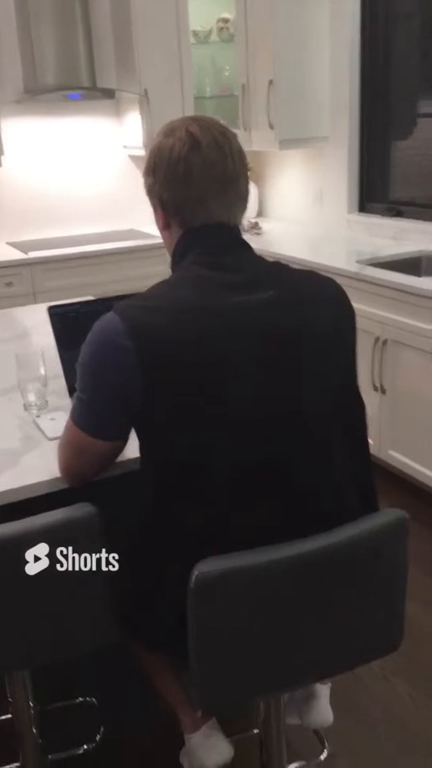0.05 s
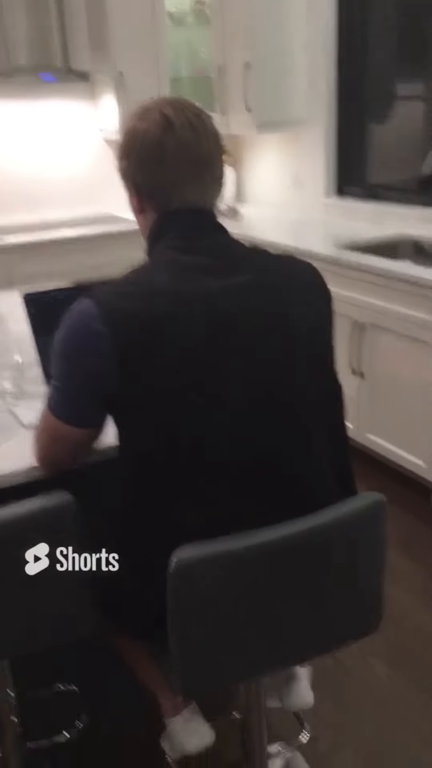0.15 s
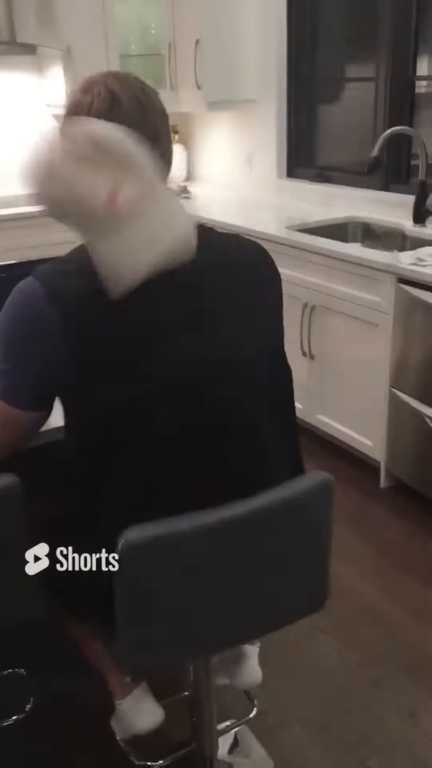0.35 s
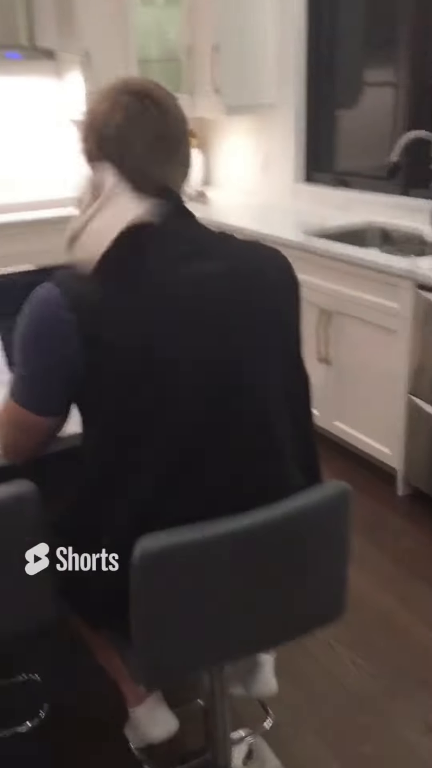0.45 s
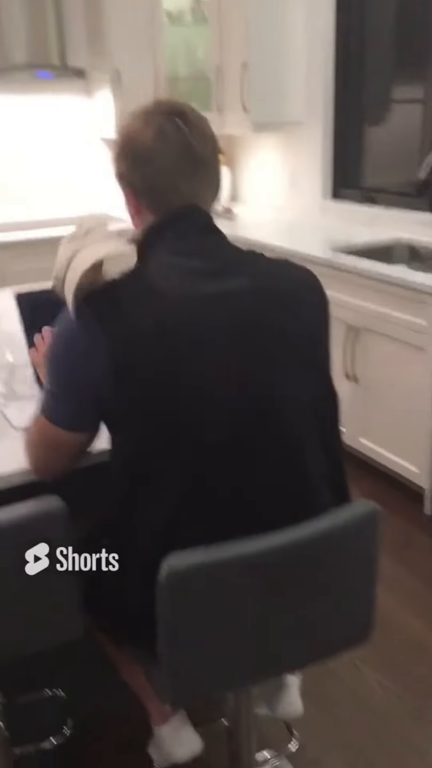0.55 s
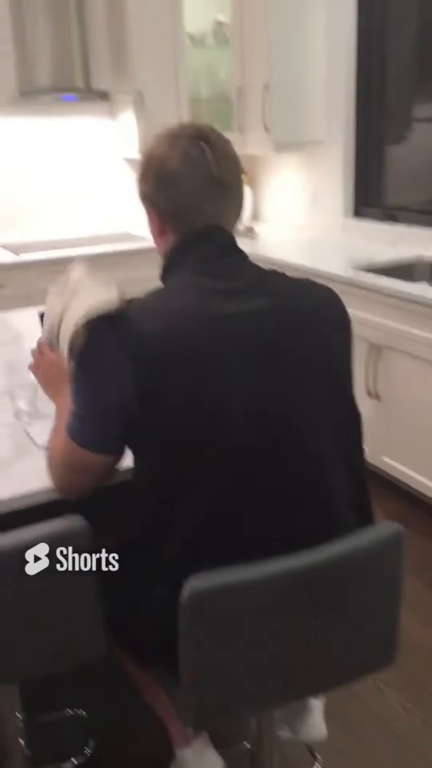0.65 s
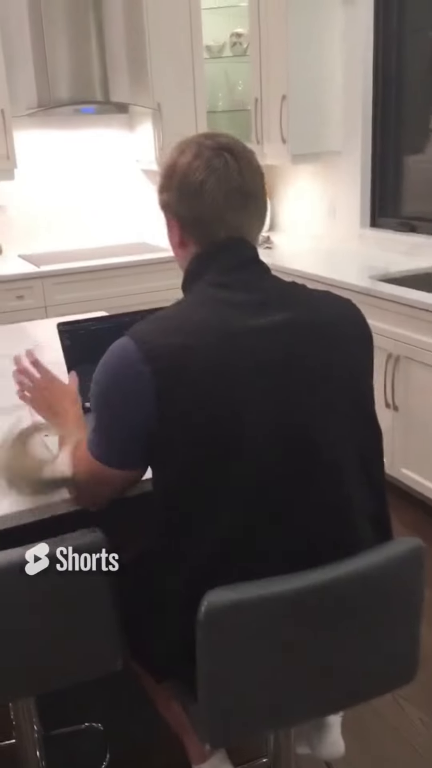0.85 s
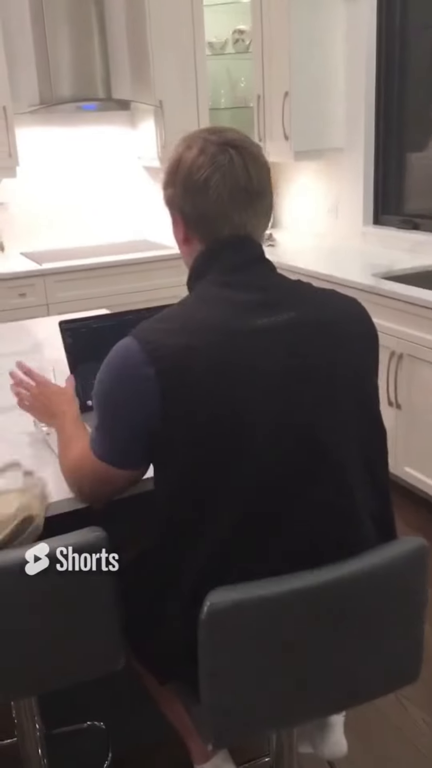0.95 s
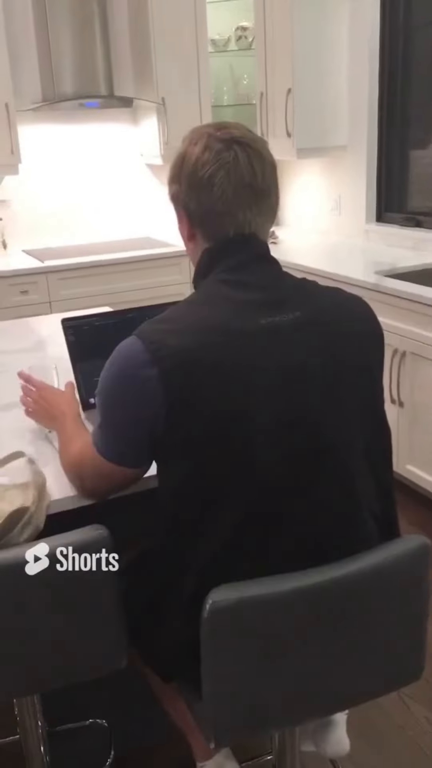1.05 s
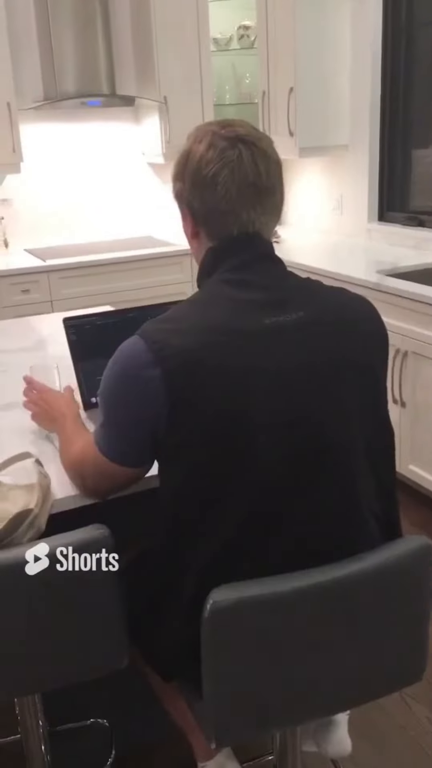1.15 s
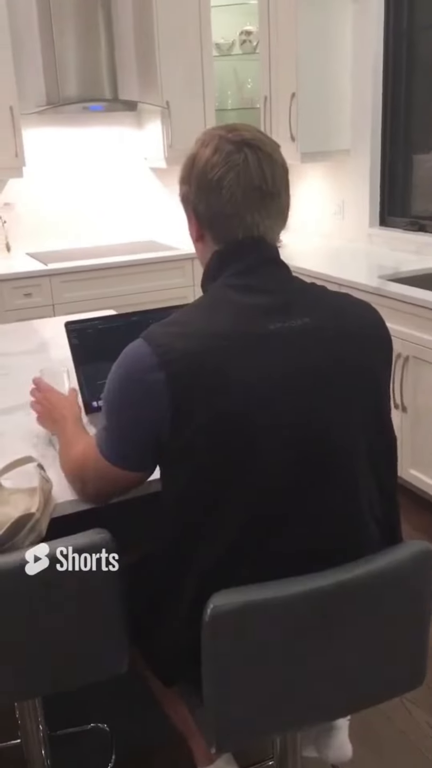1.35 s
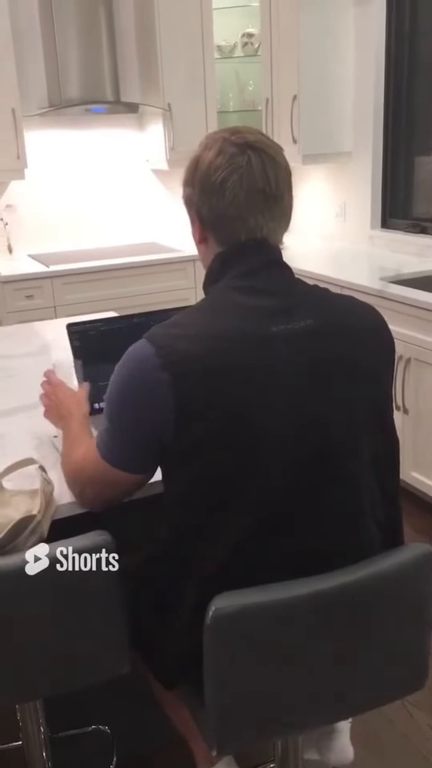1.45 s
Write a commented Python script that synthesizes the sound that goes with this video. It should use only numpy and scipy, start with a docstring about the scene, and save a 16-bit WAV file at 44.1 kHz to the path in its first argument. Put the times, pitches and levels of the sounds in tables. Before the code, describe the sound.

A soft bag thuds into someone's back, then drops onto a counter in a kitchen.

```python
"""Soft bag thrown across a kitchen

One hand-held camera microphone in a live kitchen. A sleeve swishes and fingers bump the camera; the bag
slaps a seated person's back, thuds and pops as it folds, slides off the shoulder and drops onto a counter,
cover first, then its weight. The hard room answers each blow of the bag over a low appliance hum."""
import sys
import numpy as np
from scipy import signal
from scipy.fft import rfft, irfft
from scipy.io import wavfile
from scipy.ndimage import map_coordinates

SR = 44100
rng = np.random.default_rng(int(sys.argv[2]) if len(sys.argv) > 2 else 0)


def master_out(mix):
    """Clip the mix to full scale and print it as 16-bit PCM to the path in sys.argv[1]."""
    frames = np.transpose(np.atleast_2d(mix))
    ceiling = np.clip(frames, -1, 1)
    pcm = np.round(ceiling * 32767).astype(np.int16)
    wavfile.write(sys.argv[1], SR, pcm)


N = 66150

# the kitchen's decay by band (frequency [Hz], t60 [s])
ROOM_T60 = [(80, 0.61), (250, 0.65), (700, 1), (1800, 0.93), (3200, 0.87), (5500, 0.88), (12000, 0.58)]
# colour of the kitchen's answer (frequency [Hz], level [dB])
ROOM_COLOUR = [(20, -22), (55, -1), (200, 1), (330, -1.5), (480, 1.5), (720, 0.5), (1100, -3.5), (2000, 1),
               (5000, -4.5), (12000, -6)]
# colour of the ventilation noise (frequency [Hz], level [dB])
VENT_COLOUR = [(20, -20), (55, -2.5), (110, -4), (190, 0.5), (300, -2.5), (450, -11.5), (650, -5),
               (1200, -17), (3000, -25.5), (8000, -33.5), (15000, -37)]
# rubs of cloth (peak time [s], level [dB], half length [s], tilt [dB/octave])
RUBS = [(0.032, -61.5, 0.041, 0.5), (0.113, -62.5, 0.014, 0), (.207, -59, 0.011, -2.5),
        (0.247, -58, 0.018, -0.5), (0.295, -51.5, 0.0096, 3.5), (0.304, -50, 0.0085, 0),
        (0.556, -57.5, 0.017, 0.5), (.605, -64, 0.029, -0.5), (0.759, -64.5, 0.013, 4),
        (0.835, -64.5, 0.016, 1), (1.007, -55.5, 0.014, -0.5)]
# colour of rubbing cloth (frequency [Hz], level [dB])
RUB_COLOUR = [(100, -7), (300, 6), (1000, -2), (2200, -2.5), (4000, -6), (9000, -10.5), (13000, -13),
              (16000, -22)]
# fingers bumping the camera (time [s], level [dB], pitch [Hz], rise [s])
BUMPS = [(0.1387, -46.5, 605, .0014), (0.149, -47, 79, 0.0065), (.1918, -46, 865, 0.00063),
         (.2165, -45.5, 670, 0.0018), (0.2237, -38.5, 694, 0.001), (.231, -40.5, 91, 0.0054),
         (0.25, -50, 85, 0.011), (0.3017, -32, 694, 0.00039), (0.302, -49, 71, 0.012)]
# slaps of the bag's cover
# (time [s], crack level [dB], tilt [dB/octave], crumple [dB re crack], room send [dB], surface)
SLAPS = [(0.4412, -32, 1.75, -21.5, 0, "back"), (0.4443, -32.5, -1.5, -10, 0, "back"),
         (0.446, -46, 10, -18, 4.5, "back"), (.4518, -38, -3, -11.5, 0.5, "back"),
         (.459, -37.5, -3, -14.5, 2, "back"), (0.9389, -34.5, 1.5, -13, -1, "counter"),
         (0.9451, -45, -5, -10.5, 6.5, "counter"), (0.9517, -38, 0, -6, 0, "counter"),
         (.958, -45.5, -3.5, -10, 4, "counter"), (0.9933, -34, -0.3, -17, -1.5, "counter")]
# colour of the cover on each surface (frequency [Hz], level [dB])
SLAP_COLOUR = {"back": [(100, -6), (300, -2.5), (800, 4.5), (1800, 3), (2800, -6.5), (4000, -6.5),
               (7000, -11.5), (12000, -23.5), (16000, -28)], "counter": [(100, -1), (400, -5), (800, 5),
               (1400, 1), (2200, -0.5), (3300, -1.5), (4600, -8.5), (7500, -15), (11000, -16.5),
               (16000, -25)]}
# blows of the bag's weight
# (time [s], level [dB], pitch [Hz], rise [s], friction [dB re blow], room send [dB])
THUDS = [(0.4437, -38.5, 397, 0.0024, -14, 4), (0.446, -36, 132, 0.0059, -21, -4),
         (.454, -49, 52.5, 0.016, -20, 0), (.455, -40, 260, 0.0033, -22, 1.5),
         (.457, -38.5, 314, 0.0035, -15, 7), (.4715, -38, 742, 0.0015, -22, 6),
         (0.475, -34, 127, 0.0069, -19, -6.5), (0.4802, -20.5, 897, 0.00075, -16.5, -1),
         (.497, -31.5, 937, 0.0014, -9, -7), (0.9939, -25, 217, 0.004, -22.5, -5.5),
         (1.004, -38, 100, 0.0077, -11.5, -3), (1.012, -31, 323, 0.0036, -14.5, -4),
         (1.035, -47.5, 56.5, 0.027, -11, -12)]
# colour of the friction in each blow (frequency [Hz], level [dB])
FRICTION_COLOUR = [(100, 2), (300, 0), (800, -4), (1800, -4), (2800, -22.5), (4500, -28), (9000, -35),
                   (16000, -35)]
# modes of the counter and its cabinet (frequency [Hz], level [dB], t60 [s])
COUNTER_MODES = [(101.5, 5, .25), (182.7, -6.5, 0.78), (252, -9, 0.15), (336, -2, 0.4), (360.7, 1.5, 0.34),
                 (455, -2.5, 0.34)]


def amp(db):
    """Decibels to gain."""
    return 10 ** (np.asarray(db) / 20)


def unit(x):
    """Scaled to rms 1."""
    return x / np.sqrt(np.mean(x ** 2) + 1e-20)


def along(points, hz):
    """(frequency [Hz], value) points read on a log axis."""
    freqs, values = np.transpose(points)
    return np.interp(np.log(hz + 1), np.log(freqs + 1), values)


def since(start):
    """Seconds since start, zero before."""
    return np.maximum(np.arange(N) / SR - start, 0)


def wobble(rate):
    """A smooth random curve, rate knots a second."""
    return map_coordinates(rng.standard_normal(N // 8), [np.arange(N) * rate / SR], mode="wrap")


def coloured(x, points, tilt_db=0):
    """x through a causal filter of the given spectrum, tilted per octave about 2 kHz."""
    hz = np.fft.rfftfreq(2 * N, 1 / SR)
    octaves = np.log2(np.maximum(hz, 250) / 2000)
    cepstrum = irfft(np.log(amp(along(points, hz) + tilt_db * octaves)))
    cepstrum[1:N] *= 2  # folded for minimum phase
    cepstrum[N:] = 0
    return irfft(rfft(x, 2 * N) * np.exp(rfft(cepstrum)))[:N]


def swell(start, rise):
    """Envelope of a soft contact: tops out after rise seconds and dies quickly."""
    u = since(start) / rise
    return (u * np.exp(1 - u)) ** 2


def push(start, hz, rise):
    """A heavily damped swing of a few cycles."""
    return swell(start, rise) * np.sin(2 * np.pi * hz * since(start))


def kitchen(x):
    """The room's answer: early echoes off the cabinets, then a tail that dies by band."""
    early_db, early_t60_s, build_s = -5, 0.061, 0.0044
    t = since(0)
    hz, frame_s, spectra = signal.stft(rng.standard_normal(N), SR, nperseg=256)
    decay = amp(-60 * frame_s / along(ROOM_T60, hz)[:, None])
    tail = signal.istft(spectra * decay, SR, nperseg=256)[1][:N]
    early = rng.standard_normal(N) ** 3 * amp(-60 * t / early_t60_s)
    build = 1 - np.exp(-(t / build_s) ** 2)
    answer = (unit(tail * build) + amp(early_db) * unit(early * build)) / np.sqrt(N)
    return signal.fftconvolve(x, coloured(answer, ROOM_COLOUR))[:N]


def room_tone():
    """Ventilation noise and a wavering appliance hum in the background."""
    air_db, hum_db, hum_hz, waver_db = -60.5, -65, 189.4, -2.5
    air = unit(coloured(rng.standard_normal(N), VENT_COLOUR))
    waver = amp(waver_db * wobble(15))
    hum = unit(waver * np.sin(2 * np.pi * hum_hz * since(0) + 0.64 * wobble(11.64)))
    return amp(air_db) * air + amp(hum_db) * hum


def cloth():
    """Grainy swishes: the throwing arm's sleeve, then the bag sliding off the shoulder."""
    out = np.zeros(N)
    for peak_s, db, half_s, tilt_db in RUBS:
        fibres = rng.standard_normal(N) * amp(wobble(rate=500))  # about 1 dB of grain
        stroke = np.exp(-.5 * ((since(0) - peak_s) / half_s) ** 2)
        out += amp(db) * stroke * unit(coloured(fibres, RUB_COLOUR, tilt_db))
    return out + amp(-9) * kitchen(out)


def camera_bumps():
    """Close, dry knocks reach the microphone through the camera's body during the throw."""
    return sum(amp(db) * push(start, hz, rise) for start, db, hz, rise in BUMPS)


def slaps():
    """Across the room the cover cracks on a surface and crumples; the hard counter makes it crisper."""
    crack_t60_s, crumple_t60_s = 0.0044, 0.087
    out = np.zeros(N)
    for start, db, tilt_db, crumple_db, room_db, surface in SLAPS:
        t = since(start)
        crack = rng.choice([-1, 1], N) * amp(-60 * t / crack_t60_s)
        crumple = unit(rng.laplace(size=N)) * amp(crumple_db - 60 * t / crumple_t60_s)
        slap = coloured((t > 0) * (crack + crumple), SLAP_COLOUR[surface], tilt_db)
        # the attack carries the energy of 1 ms at the crack level
        slap *= amp(db) * np.sqrt(.001 * SR) / np.linalg.norm(slap[t < crack_t60_s / 2])
        out += slap + amp(room_db) * kitchen(slap)
    return out


def thuds():
    """The bag's weight arrives in several dull blows, on the back and then on the counter."""
    out = np.zeros(N)
    for start, db, hz, rise, friction_db, room_db in THUDS:
        friction = swell(start, rise) * unit(coloured(rng.standard_normal(N), FRICTION_COLOUR))
        blow = amp(db) * (push(start, hz, rise) + amp(friction_db) * friction)
        out += blow + amp(room_db) * kitchen(blow)
    return out


def counter():
    """The counter and its cabinet ring low after the landing."""
    landing_s, rise_s, gain_db = 1, 0.01, -43
    t = since(landing_s)
    ring = np.zeros(N)
    for hz, db, t60 in COUNTER_MODES:
        phase = 2 * np.pi * hz * t + 0.19 * wobble(35.6)
        ring += amp(db - 60 * t / t60) * np.sin(phase)
    return amp(gain_db) * ring * (1 - np.exp(-t / rise_s))


def scene():
    """The kitchen in mono, from where the camera is held."""
    return (room_tone() + slaps() + thuds() + counter() + camera_bumps() + cloth())[None]


def record(dry):
    """The camera keeps nothing above its band limit."""
    top_hz = 15900
    hz = np.fft.rfftfreq(2 * N, 1 / SR)
    return irfft(rfft(dry, 2 * N) * (hz < top_hz))[:, :N]


dry = scene()
out = record(dry)
master_out(out)
```